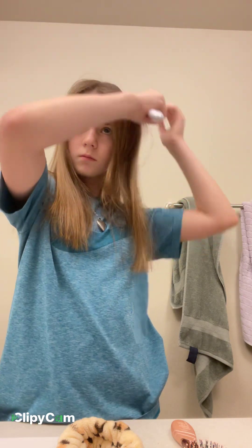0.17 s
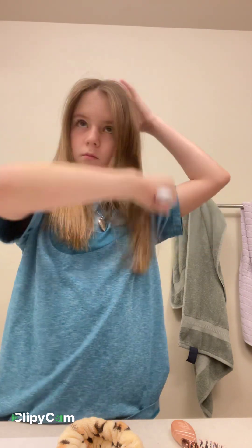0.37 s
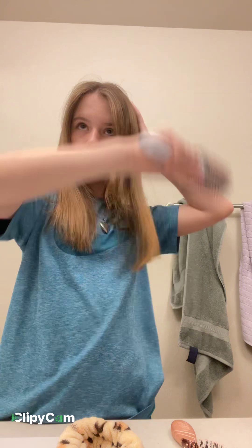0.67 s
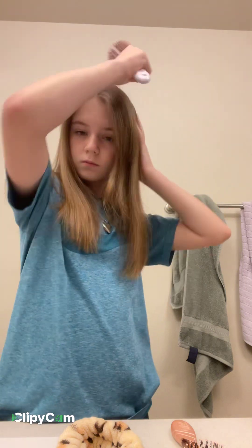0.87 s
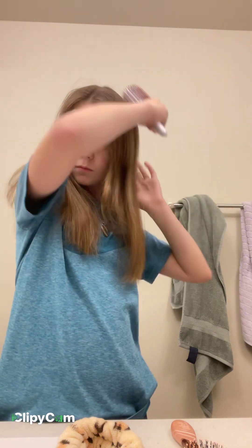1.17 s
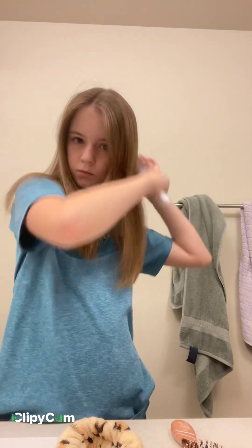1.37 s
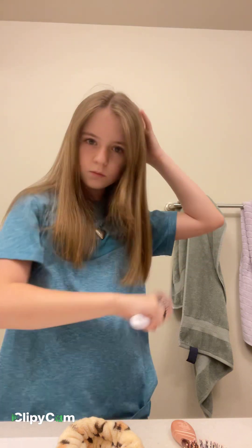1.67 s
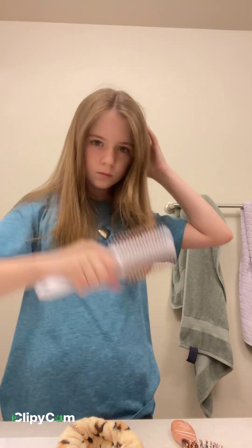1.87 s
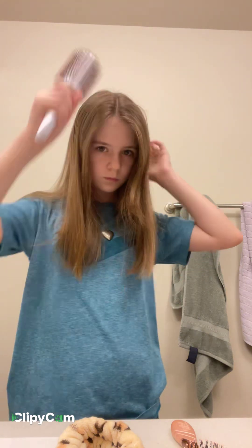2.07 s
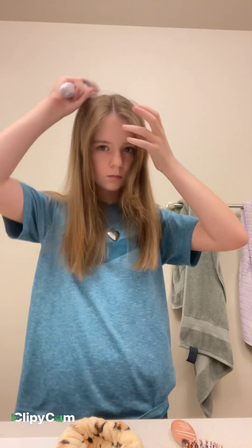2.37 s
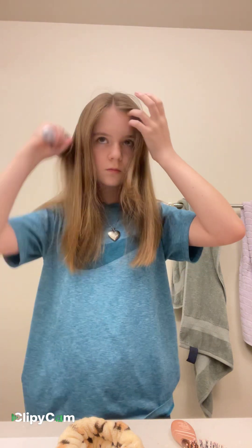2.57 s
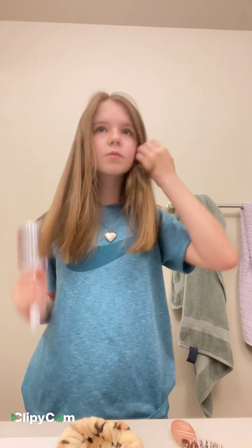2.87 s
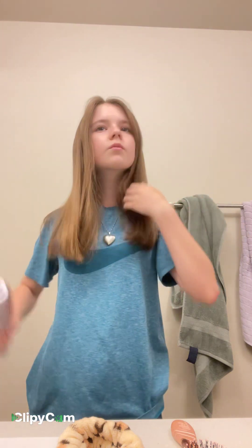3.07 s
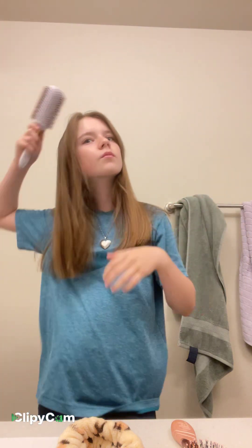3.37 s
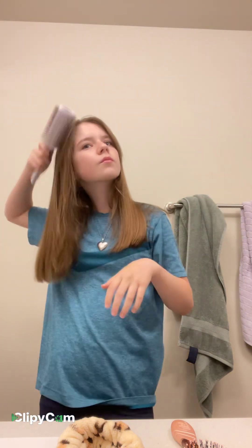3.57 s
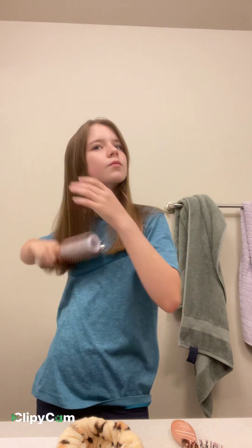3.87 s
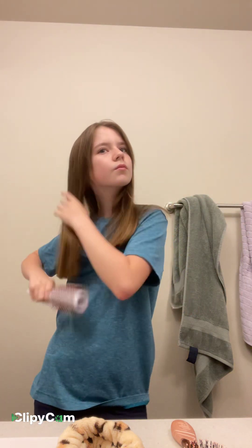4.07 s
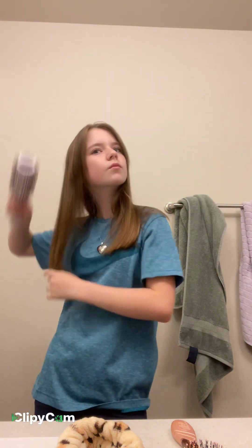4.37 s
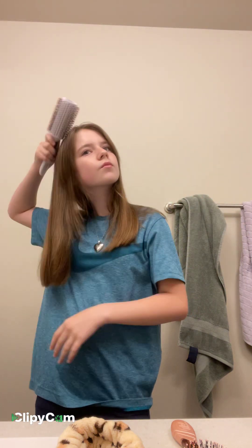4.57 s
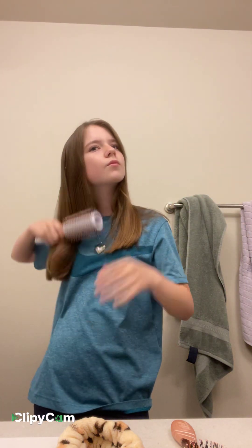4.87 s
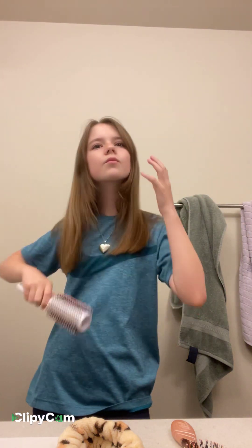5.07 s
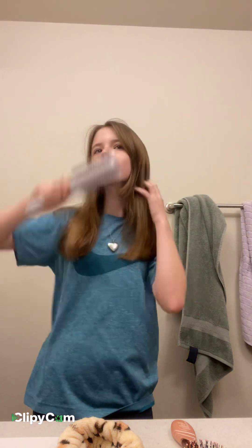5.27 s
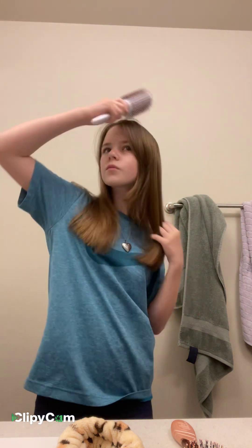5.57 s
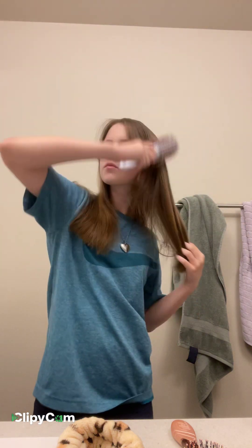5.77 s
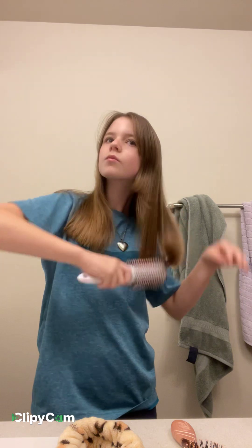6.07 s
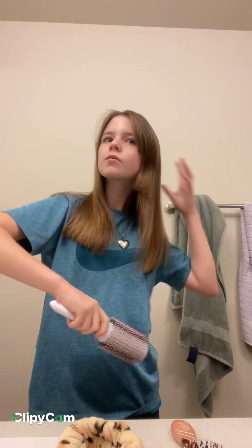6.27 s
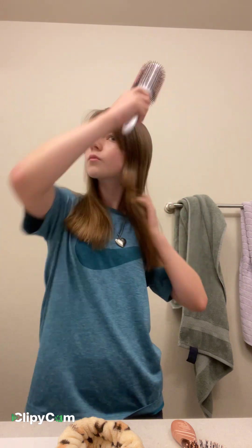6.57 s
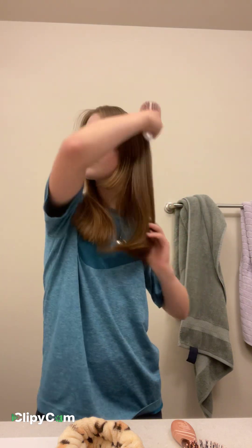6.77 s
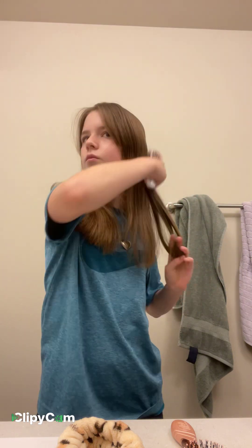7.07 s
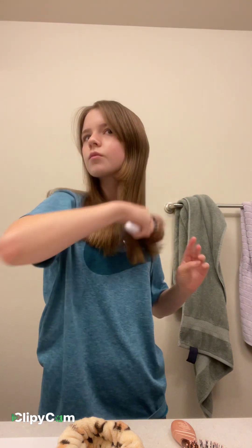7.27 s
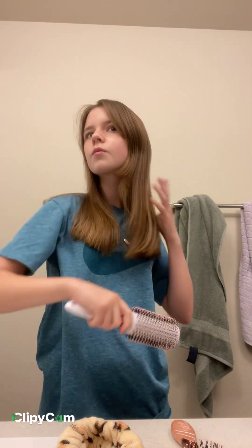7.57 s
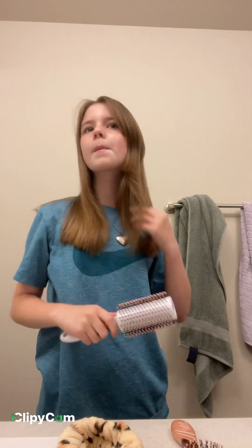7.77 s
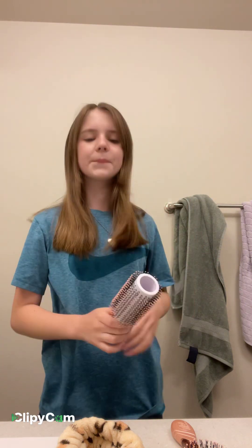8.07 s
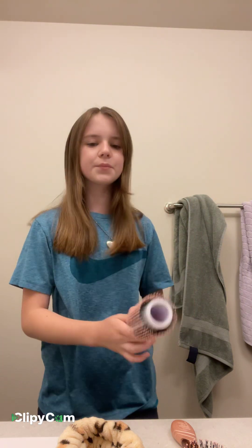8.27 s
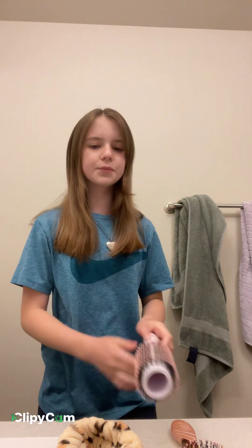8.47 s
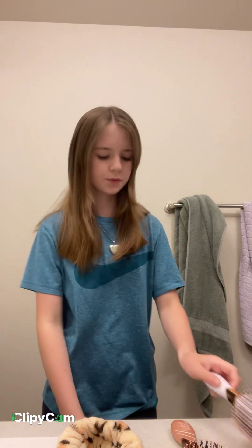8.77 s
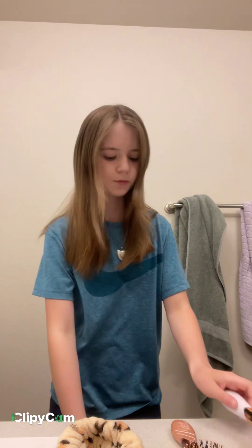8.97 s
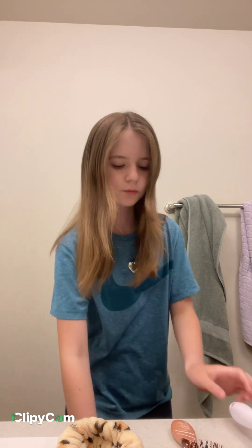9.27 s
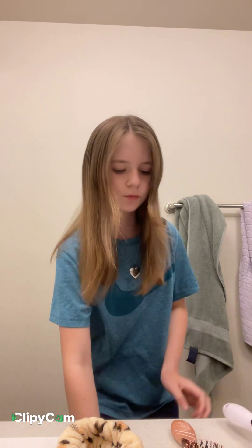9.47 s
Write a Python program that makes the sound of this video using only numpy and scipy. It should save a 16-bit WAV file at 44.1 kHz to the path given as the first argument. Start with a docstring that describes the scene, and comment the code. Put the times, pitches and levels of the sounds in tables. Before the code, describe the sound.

Close in a small, slightly reverberant bathroom, a hollow round brush is pulled through long dry hair, about one stroke a second. Each lands with a crunch, hisses brightly with a fine rasp, and sometimes tugs at the ends. Sleeves rustle between strokes. A hard knock comes with the third stroke, a flick and a high ping follow later strokes, and finally the brush knocks and rattles on the counter. A faint fan and hiss sit underneath.

```python
"""Hair brushing in a small bathroom

A round vented brush is pulled through long dry hair over a faint fan, hiss and rumble. After the faint end of
a stroke under way, each new one lands with a crunch, presses on the scalp, glides and tugs at the ends:
filtered random clicks for slipping hairs, resonators for the hollow barrel. Sleeves rustle, the brush bumps,
knocks and twice snaps free (noise bursts, decaying sines), then is laid on the counter. Room reverb; one
signal in both channels.
"""
import sys
import numpy as np
from scipy import signal
from scipy.fft import rfft, irfft
from scipy.io import wavfile
from scipy.ndimage import uniform_filter1d

SR = 44100
rng = np.random.default_rng(int(sys.argv[2]) if len(sys.argv) > 2 else 0)


def dump(signal):
    """Clip the signal to [-1, 1] and save it as 16-bit WAV at the path in sys.argv[1]."""
    limited = np.clip(np.atleast_2d(signal).T, -1, 1)
    pcm = np.round(limited * 32767).astype(np.int16)
    wavfile.write(sys.argv[1], SR, pcm)


N = 424683
TIME = np.arange(N) / SR
SHORT_TIME = TIME[:SR // 2]  # clock of every short sound and impulse response, in s


def undb(db):
    """Decibels to amplitude gain."""
    return 10 ** (np.asarray(db) / 20)


def unit(x):
    """Scale to rms 1."""
    return x / np.sqrt(np.mean(x ** 2))


def convolve(x, response):
    """Play x through an impulse response."""
    return signal.fftconvolve(x, response)[:len(x)]


def colour(x, points, size=4096):
    """Minimum-phase filter through (f/Hz, level/dB) points that keeps the energy of white noise."""
    hz, db = np.transpose(points)
    bins_hz = np.arange(size // 2 + 1) * SR / size
    log_gain = np.log(undb(np.interp(np.log(bins_hz + 1), np.log(hz), db)))
    # folding the cepstrum onto positive time makes the filter causal
    cepstrum = irfft(log_gain)
    cepstrum[1:size // 2] *= 2
    cepstrum[size // 2 + 1:] = 0
    response = irfft(np.exp(rfft(cepstrum)))
    return convolve(x, response / np.linalg.norm(response))


def fade(t60_s):
    """Exponential decay from time zero, 60 dB down after t60_s."""
    return np.exp(-np.minimum(np.log(1000) * SHORT_TIME / t60_s, 50))


def walk(rate):
    """Slow random drift of rms 1: levels held 1 / rate s, with straight ramps between them."""
    hold = int(SR / rate)
    levels = np.repeat(rng.standard_normal(N // hold + 1), hold)[:N]
    return unit(uniform_filter1d(levels, hold))


def slips(rate, spread_db):
    """Random tiny clicks of fibres letting go, rate per second, a few much larger than the rest."""
    happens = rng.random(N) < rate / SR
    size = undb(spread_db * np.minimum(rng.exponential(size=N), 5))
    return unit(happens * size * rng.choice([-1, 1], N))


def burst(t60_s):
    """A short crunch of contact: decaying white noise."""
    return rng.standard_normal(SR // 2) * fade(t60_s)


def add(track, s, sound, db):
    """Place a short sound; its level is the rms its energy would have over 30 ms."""
    start = max(int(s * SR), 0)
    sound = sound * undb(db) * np.sqrt(.03 * SR / np.sum(sound ** 2))
    track[start:start + len(sound)] += sound[:N - start]


def swell(peak_s, rise_s, fall_s, shape=1.4):
    """A gain that rises to its peak and falls again; shape 1 is pointed, 2 bell-shaped."""
    side_s = np.where(TIME < peak_s, rise_s, fall_s)
    away = np.abs(TIME - peak_s) / np.maximum(side_s, 1e-3)
    return np.exp(-np.minimum(away ** shape, 50))


def movements(rows):
    """Gain of separate swelling movements, summed in power."""
    return np.sqrt(sum((undb(db) * swell(s, rise_s, fall_s)) ** 2 for s, rise_s, fall_s, db in rows))


def dying(start_s, constant_s):
    """Gain 1 until start_s, then an exponential fall."""
    return np.exp(-np.clip((TIME - start_s) / constant_s, 0, 20))


# fan hum: (f/Hz, mean level/dB)
FAN_HUM = [(56, -73.5), (158, -73.5)]
# spectrum of hiss and rumble: (f/Hz, relative level/dB per Hz)
FLOOR_SPECTRUM = [(22, -26), (40, 0), (95, 0.5), (160, -6), (330, -8), (600, -12.5), (1000, -16.5),
                  (1550, -18), (2200, -15.5), (7000, -15), (9500, -13.5), (15500, -13)]


def background(floor_db=-58.2):
    """Shaped noise whose level wavers a little, with fan hum as sines of drifting level and phase."""
    out = unit(colour(rng.standard_normal(N), FLOOR_SPECTRUM)) * undb(floor_db + 1.2 * walk(8.1))
    for hz, db in FAN_HUM:
        tone = np.sqrt(2) * np.sin(2 * np.pi * hz * TIME + 0.87 * walk(9))
        out += undb(db + 2 * walk(5.6)) * tone
    return out


# brush strokes, the first row only the faint end of one already under way; levels before the trims in brushing:
# (sound starts t/s, presses hardest t/s, half width of press t/s, leaves the hair t/s,
# starting crunch level/dB, scalp press level/dB, glide level/dB, tug at the ends level/dB,
# rasp level/dB re swish, barrel ring level/dB re swish)
BRUSH_STROKES = [ (0, 0, .05, .02, -56, -62, -54.5, -58, -12, -18),
                 (.689, 1.11, .14, 1.44, -45, -47.5, -53.8, -45, -12, -11),
                 (1.92, 2.15, .08, 2.565, -48, -50, -49.3, -47.5, -8.5, -10.5),
                 (3.233, 3.4, .09, 3.825, -64, -46, -48.7, -39.5, -9.5, -12.5),
                 (4.433, 4.56, .08, 4.96, -41.5, -47.5, -47, -52, -11, -9.5),
                 (5.49, 5.63, .085, 5.87, -50, -45.5, -51, -56, -14, -10),
                 (6.562, 6.9, .1, 7.04, -51, -49.5, -49.3, -49.5, -12.5, -15),
                 (7.685, 7.91, .1, 8.35, -47.5, -50, -49.7, -50.5, -11.5, -10), ]


def stroke_gains(first_grip=.55, ring_glide_db=-3):
    """Gains of swish, rasp and barrel ring: a glide with a press on the scalp and a tug at the ends."""
    grip_s, leave_time_s = .16, .035  # time constants: bristles sink in, last hairs fall away
    tug_lead_s, tug_s = .045, .045  # the tug peaks this long before the brush leaves; half width
    ring_fade_s = .42  # time constant: past the scalp the hair wraps the barrel and mutes it
    gains = np.zeros((3, N))
    for start_s, press_s, width_s, leave_s, _, press_db, glide_db, tug_db, rasp_db, ring_db in BRUSH_STROKES:
        in_hair = (TIME >= start_s) * dying(leave_s, leave_time_s)
        # drag grows from first_grip at the start to its full share
        glide = undb(glide_db) * (1 - (1 - first_grip) * dying(start_s, grip_s))
        press = undb(press_db) * swell(press_s, width_s, width_s)
        tug = undb(tug_db) * swell(leave_s - tug_lead_s, tug_s, tug_s)
        drag = np.linalg.norm([glide, press, tug], axis=0)
        # bristles pressed against the scalp ring the barrel most
        ring = np.hypot(press, undb(ring_glide_db) * np.hypot(glide, tug)) * dying(press_s, ring_fade_s)
        gains += in_hair * np.array([drag, undb(rasp_db) * drag, undb(ring_db) * ring])
    return gains


# spectrum of hair swishing over bristles: (f/Hz, relative level/dB per Hz)
HAIR_SPECTRUM = [(2000, -37.5), (6300, -19), (7600, -2.5), (8900, 0), (9900, 0.5), (10300, -5), (11200, -2),
                 (11800, -5), (14400, 1.5), (16000, -3.5)]
# spectrum of taut hairs rasping: (f/Hz, relative level/dB per Hz)
RASP_SPECTRUM = [(200, -4.5), (600, -5), (950, -8), (1550, -9.5), (2100, -1.5), (4300, 0), (7000, 0),
                 (12000, -10.5)]
# resonances of the barrel rubbed by bristles: (f/Hz, bandwidth f/Hz, relative level/dB)
BARREL_MODES = [(746, 42, -10), (3007, 24.5, 2), (3586, 46, 1.3), (5250, 94, 1), (7130, 37, -5),
                (7600, 40, 1), (9950, 110, -5)]


def brushing(swish_db=1.32, rasp_db=1.35, ring_db=5.0, patchy_db=1.83):
    """Hairs slip over the bristles: a bright swish, a lower rasp when taut, and the singing barrel."""
    drag, pull, ring = stroke_gains()
    catching = undb(patchy_db * walk(70))
    friction = slips(rate=14000, spread_db=1.5) * catching
    taut_friction = slips(rate=6000, spread_db=2.5) * catching
    swish = colour(friction, HAIR_SPECTRUM) * drag * undb(swish_db)
    rasp = colour(taut_friction, RASP_SPECTRUM) * pull * undb(rasp_db)
    barrel = np.zeros(N)
    for hz, width, db in BARREL_MODES:
        # each resonance is fed by different bristles, so they swell one by one
        feed = friction * undb(2.6 * walk(18))
        resonator = signal.iirpeak(hz, hz / width, fs=SR)
        barrel += undb(db) * signal.lfilter(*resonator, feed)
    return swish + rasp + unit(barrel) * ring * undb(ring_db)


def ring_barrel(x):
    """The hollow barrel answers a short contact with its decaying resonances."""
    response = np.zeros(len(SHORT_TIME))
    for hz, width, db in BARREL_MODES:
        decay = np.exp(-np.pi * width * SHORT_TIME)
        response += undb(db) * width * decay * np.sin(2 * np.pi * hz * SHORT_TIME)
    return convolve(x, response / np.linalg.norm(response))


def bristle_crunches(barrel_db=-7, spiky_db=4, touch_s=.01):
    """Bristles crunch on the hair: spiky noise, coloured and rung through the barrel."""
    out = np.zeros(N)
    # the first row is a faint crunch within the stroke under way, the others are landings
    for s, _, _, _, db, *_ in BRUSH_STROKES:
        # the rows of bristles come in one after another
        onset = np.minimum(SHORT_TIME / touch_s, 1) * undb(spiky_db * walk(1100)[:len(SHORT_TIME)])
        crunch = burst(t60_s=0.04) * onset
        add(out, s, colour(crunch, HAIR_SPECTRUM) + undb(barrel_db) * ring_barrel(crunch), db)
    return out


# sleeves and hands moving, levels before the cloth trim: (strongest t/s, rise t/s, fall t/s, level/dB)
RUSTLE_MOVES = [(.52, .08, .14, -65.5), (1.55, .08, .16, -63), (1.87, .14, .1, -62.5), (2.7, .1, .15, -58),
                (3.12, .12, .09, -60.5), (3.93, .06, .38, -56), (5.26, .1, .17, -59.5),
                (6.44, .22, .07, -57), (7.59, .13, .11, -62), (8.8, .2, .25, -66), (9.13, .08, .15, -53),
                (9.58, .12, .04, -65)]
# spectrum of cloth and hair under the hands: (f/Hz, relative level/dB per Hz)
CLOTH_SPECTRUM = [(200, -1), (420, 5.5), (800, -2), (1500, -6), (2200, 0.5), (7000, -1), (9500, 0.5),
                  (11500, -1.5), (15000, 1.5)]


def rustling(cloth_db=5, patchy_db=1.55):
    """Cloth and hair rustle under the hands: dense clicks of fibres, uneven in level."""
    cloth = colour(slips(rate=5000, spread_db=2.8), CLOTH_SPECTRUM)
    return cloth * undb(cloth_db + patchy_db * walk(45)) * movements(RUSTLE_MOVES)


# spectrum of the rumbling handle: (f/Hz, relative level/dB per Hz)
HANDLE_SPECTRUM = [(40, -18), (120, -4), (250, 0.5), (380, -6.5), (600, -17.5), (1200, -32.5), (3000, -39),
                   (8000, -47)]
# soft bumps against head and shoulder: (t/s, level/dB, starting pitch f/Hz)
SOFT_BUMPS = [(.803, -56, 136), (1.936, -54, 140), (3.24, -47.5, 232), (3.25, -49, 87), (4.122, -55.5, 110),
              (4.265, -49, 156), (4.445, -52.5, 128), (4.473, -55, 52), (5.8, -57, 208)]


def bumps(sag_s=.04, thud_noise=0.28):
    """Soft thuds: a sine whose pitch sags as the contact softens, with the handle rumbling along."""
    out = np.zeros(N)
    for s, db, hz in SOFT_BUMPS:
        phase = 2 * np.pi * hz * sag_s * np.log1p(SHORT_TIME / sag_s)
        rumble = colour(rng.standard_normal(len(SHORT_TIME)), HANDLE_SPECTRUM)
        add(out, s, (np.sin(phase) + thud_noise * rumble) * SHORT_TIME * fade(t60_s=0.039), db)
    return out


# brush shifted in the grip or slid on the counter, levels before the scuff trim:
# (strongest t/s, rise t/s, fall t/s, level/dB)
SCUFF_MOVES = [(2.48, .03, .03, -57), (2.76, .05, .06, -54), (3.455, .012, .045, -41.5),
               (6.46, .07, .045, -47), (9.14, .04, .14, -50.5)]


def scuffing(scuff_db=-1):
    """The handle rumbles when shifted or slid: sparser clicks through its dull spectrum."""
    scuff = colour(slips(rate=1500, spread_db=2.5), HANDLE_SPECTRUM)
    return scuff * undb(scuff_db) * movements(SCUFF_MOVES)


# light taps and hard knocks of the brush, the last ones on the counter: (t/s, level/dB of the first contact)
BRUSH_KNOCKS = [(2.745, -56), (3.4447, -37.5), (4.081, -59.5), (6.454, -51), (8.268, -60), (9.127, -52),
                (9.247, -44.5)]
# spectrum of a hard plastic knock: (f/Hz, relative level/dB per Hz)
KNOCK_SPECTRUM = [(50, -6), (260, 13), (550, -2), (1400, -4), (4000, 1.5), (6500, -4.5), (14500, -0.5)]


def knocks(count=3, bounce_s=.0074, bounce_db=-4.5):
    """Hard plastic knocks: noise bursts that rebound, weaker every time."""
    out = np.zeros(N)
    for s, db in BRUSH_KNOCKS:
        for k in range(count):
            contact = burst(t60_s=0.018) + 0.5 * burst(t60_s=0.086)
            add(out, s + k * bounce_s, colour(contact, KNOCK_SPECTRUM), db + k * bounce_db)
    return out


# brush springing out of the hair ends: (t/s, bristle flick level/dB, barrel ping level/dB,
# low clack level/dB, rip of the last hairs level/dB)
SNAP_EVENTS = [(4.9589, -36.5, -70, -78, -53), (4.9658, -41.5, -68, -80, -60),
               (5.868, -55, -27.4, -60, -50), (5.879, -55, -37.5, -35.5, -48)]
# barrel modes after a blow, before the extra early damping: (f/Hz, t60 t/s, relative level/dB)
PING_MODES = [(2960, .115, -9.3), (7480, .04, -14), (7903, 0.065, -12), (9550, 0.027, -6),
              (9800, 0.022, -4), (10930, .018, 0.5), (13100, .016, -4), (13520, .016, -6), (14200, .018, 3)]
# spectrum of bristles flicking back: (f/Hz, relative level/dB per Hz)
FLICK_SPECTRUM = [(200, -16), (1400, -26), (4500, -15), (6200, -8.5), (8500, 4), (11000, -10.5),
                  (14500, -7), (16000, -19)]
# spectrum of the low clack: (f/Hz, relative level/dB per Hz)
CLACK_SPECTRUM = [(1000, -31), (1550, -27), (2150, -2), (2850, -1.5), (3500, -16), (8000, -17)]


def snaps(lowest_hz=2100, release_s=0.00047, barrel_db=-12, chatter_db=-8):
    """Bent bristles spring back as the hair lets go and set the barrel ringing in decaying sines."""
    out, ping = np.zeros(N), np.zeros(len(SHORT_TIME))
    for k, (hz, t60, db) in enumerate(PING_MODES):
        # neighbouring modes swing in opposite directions at the struck spot
        ping += (-1) ** k * undb(db) * fade(t60) * np.sin(2 * np.pi * hz * SHORT_TIME)
    # the first swing is the widest: the bristles damp it within milliseconds
    ping = ping * np.minimum(SHORT_TIME / release_s, 1) * (1 + 3 * fade(t60_s=0.0046))
    # so small a body radiates no bass
    ping = signal.sosfilt(signal.butter(4, lowest_hz, "high", fs=SR, output="sos"), ping)
    for s, flick_db, ping_db, clack_db, rip_db in SNAP_EVENTS:
        flick = burst(t60_s=0.046)
        add(out, s, colour(flick, FLICK_SPECTRUM) + undb(barrel_db) * ring_barrel(flick), flick_db)
        add(out, s, ping, ping_db)
        # the ringing barrel makes its bristles chatter
        add(out, s, colour(burst(t60_s=0.077), HAIR_SPECTRUM), ping_db + chatter_db)
        add(out, s, colour(burst(t60_s=.018), CLACK_SPECTRUM), clack_db)
        # the last taut hairs rip over the bristles
        add(out, s, colour(burst(t60_s=.05), RASP_SPECTRUM), rip_db)
    return out


# brush rocking to rest on its bristles, one row: (strongest t/s, rise t/s, fall t/s, level/dB)
SETTLING_MOVE = (9.25, .16, .13, -59)
# spectrum of bristles rattling on the counter: (f/Hz, relative level/dB per Hz)
RATTLE_SPECTRUM = [(2000, -20), (3300, 0), (4100, -2), (5500, -14), (10000, -22)]


def settling():
    """Bristles rattle on the counter as the brush comes to rest: sparse clicks in one swell."""
    rattle = colour(slips(rate=500, spread_db=2.5), RATTLE_SPECTRUM)
    return rattle * movements([SETTLING_MOVE])


# first reflections from mirror and counter: (delay t/s, gain relative to direct sound)
REFLECTIONS = [(.0062, 0.099), (.0088, 0.3)]


def room_response(low_t60_s=0.35, treble_t60_s=0.24, split_hz=8000, room_db=-3.5):
    """Near reflections, then a short dense noise tail whose treble dies first."""
    tail = np.zeros(len(SHORT_TIME))
    for kind, t60_s in [("low", low_t60_s), ("high", treble_t60_s)]:
        band = signal.butter(2, min(split_hz, SR / 3), kind, fs=SR, output="sos")
        tail += signal.sosfilt(band, burst(t60_s))
    # silent for 4.1 ms, then ramps in over the same time
    tail *= np.clip(SHORT_TIME / 0.0041 - 1, 0, 1)
    response = undb(room_db) * tail / np.linalg.norm(tail)
    response[0] = 1
    for s, gain in REFLECTIONS:
        response[int(s * SR)] += gain
    return response / np.linalg.norm(response)


def bathroom(x, count=5):
    """The brush keeps moving, so its sound drifts among the responses of several places in the room."""
    shares = np.array([walk(6) for _ in range(count)])
    shares /= np.linalg.norm(shares, axis=0)
    responses = [room_response() for _ in shares]
    out = responses[0][0] * x  # steady direct sound
    for share, response in zip(shares, responses):
        out += convolve(x * share, np.r_[0, response[1:]])
    return out


def scene():
    """Every source played into the room, over the background, the same in both channels."""
    strokes = brushing() + bristle_crunches()
    handling = rustling() + scuffing() + settling()
    impacts = bumps() + knocks() + snaps()
    mono = background() + bathroom(strokes + handling + impacts)
    return np.array([mono, mono])


def record(dry, top_hz=15750):
    """The recorder cuts the top with a steep elliptic low-pass."""
    return signal.sosfilt(signal.ellip(10, .2, 70, top_hz, fs=SR, output="sos"), dry)


dry = scene()
out = record(dry)
dump(out)
```